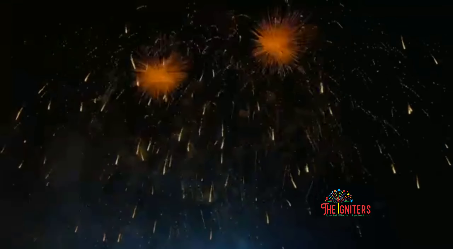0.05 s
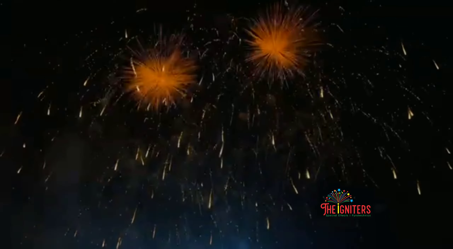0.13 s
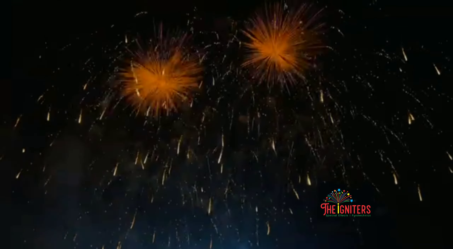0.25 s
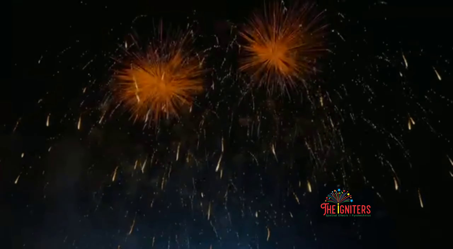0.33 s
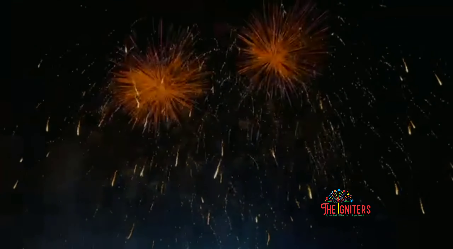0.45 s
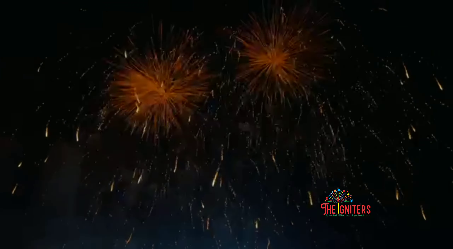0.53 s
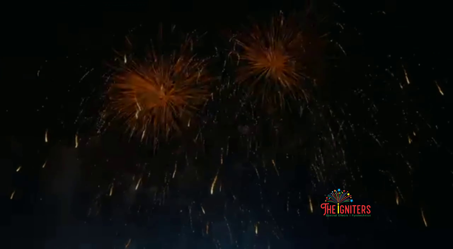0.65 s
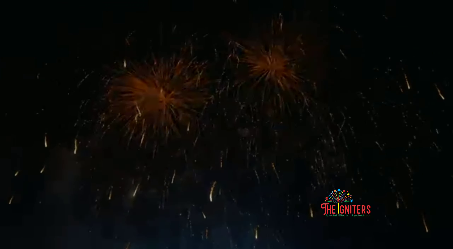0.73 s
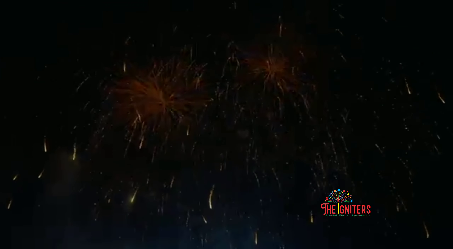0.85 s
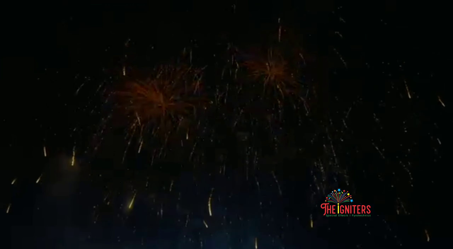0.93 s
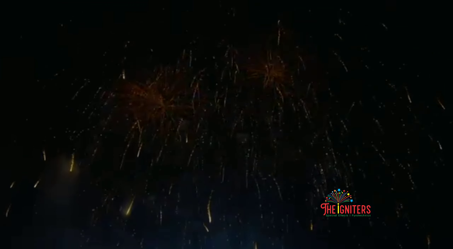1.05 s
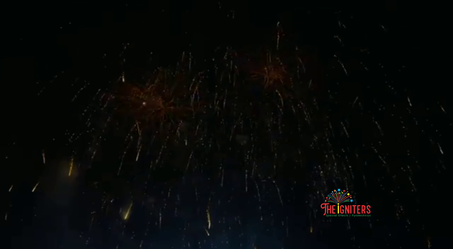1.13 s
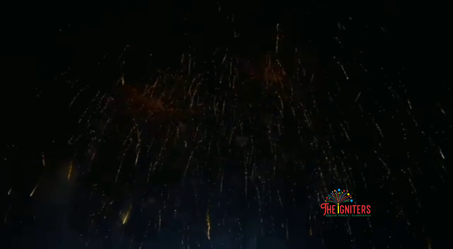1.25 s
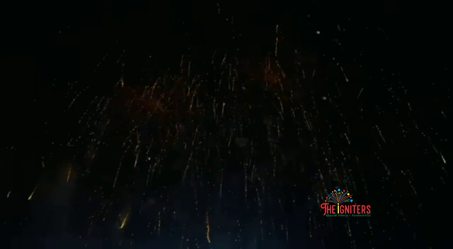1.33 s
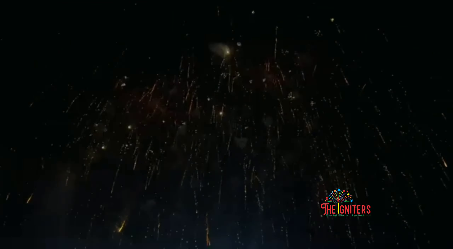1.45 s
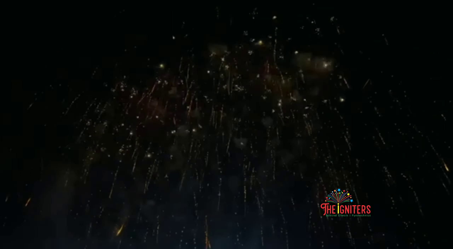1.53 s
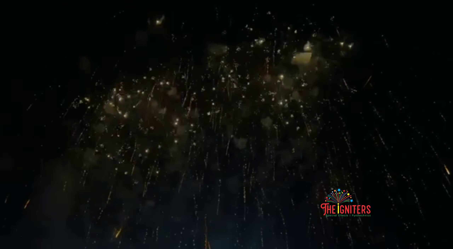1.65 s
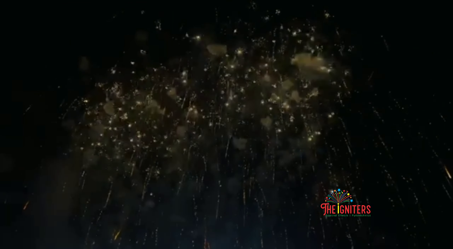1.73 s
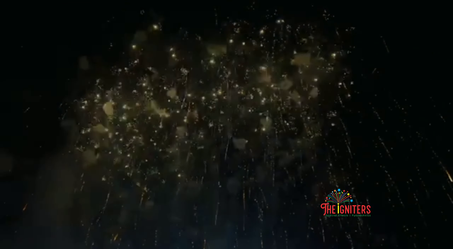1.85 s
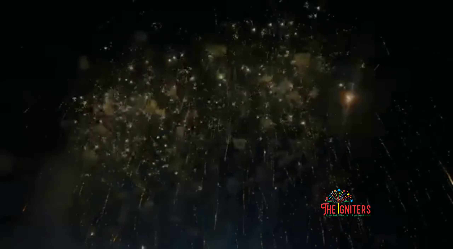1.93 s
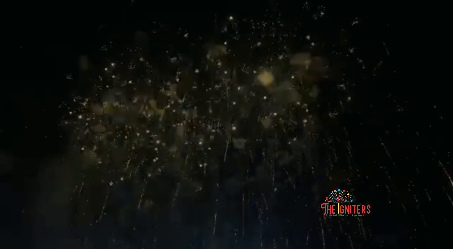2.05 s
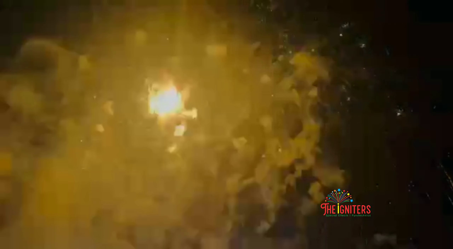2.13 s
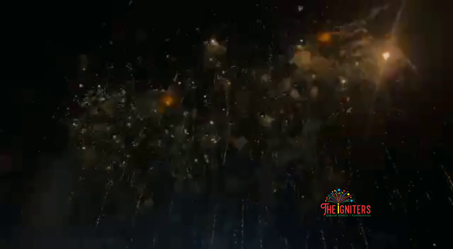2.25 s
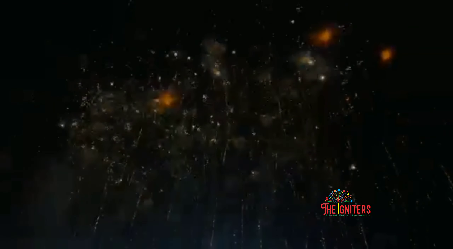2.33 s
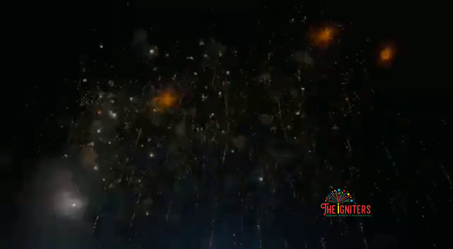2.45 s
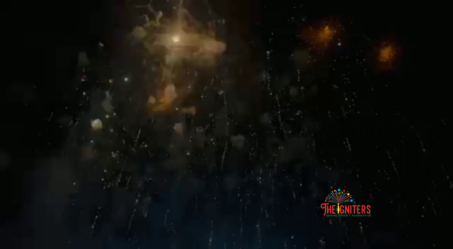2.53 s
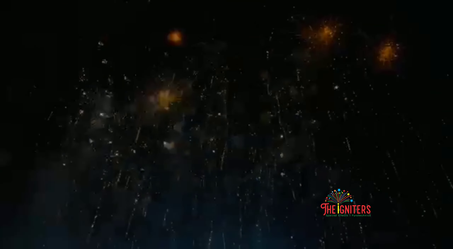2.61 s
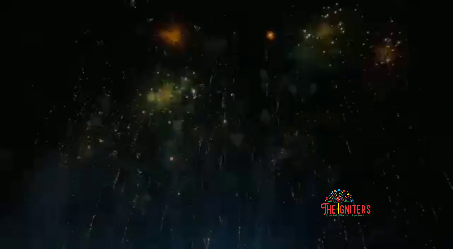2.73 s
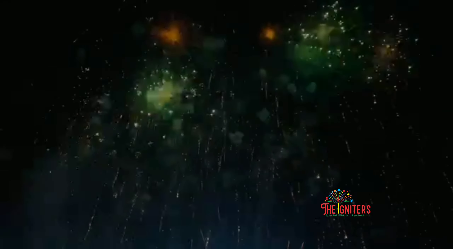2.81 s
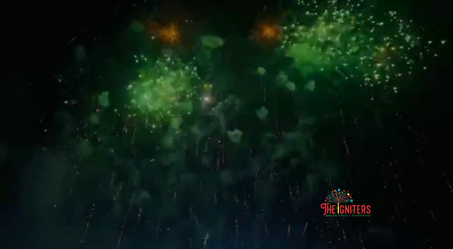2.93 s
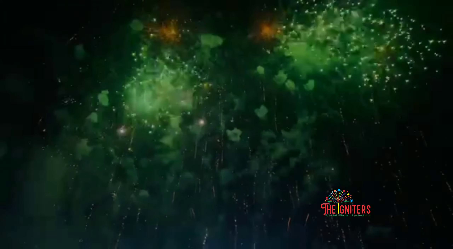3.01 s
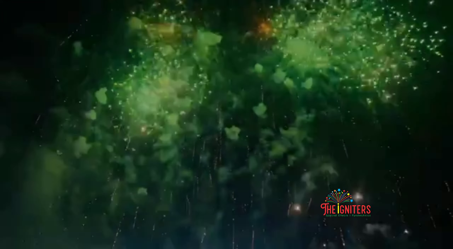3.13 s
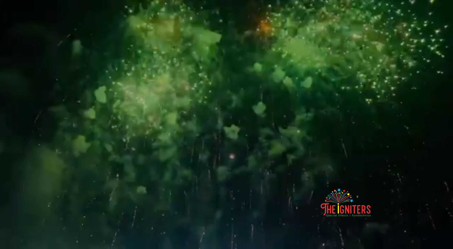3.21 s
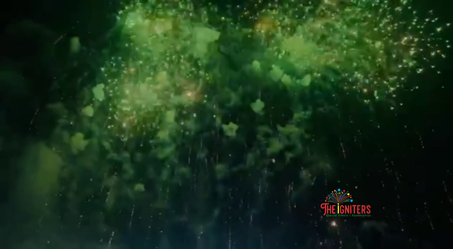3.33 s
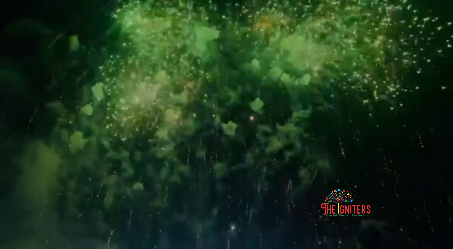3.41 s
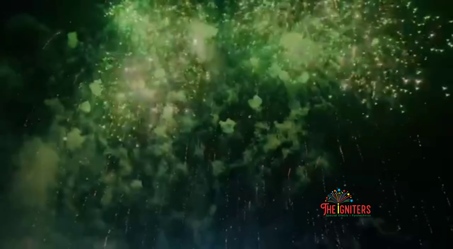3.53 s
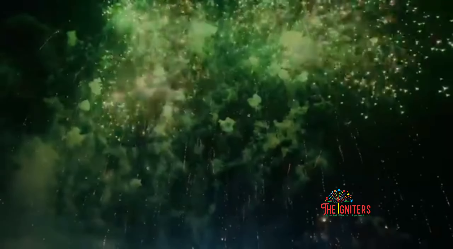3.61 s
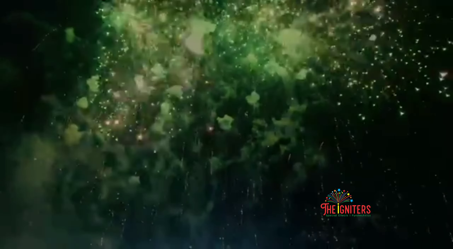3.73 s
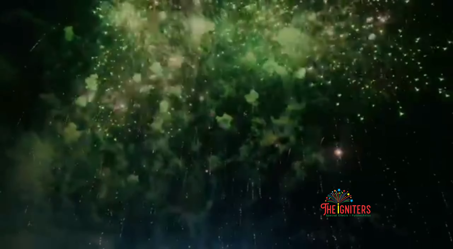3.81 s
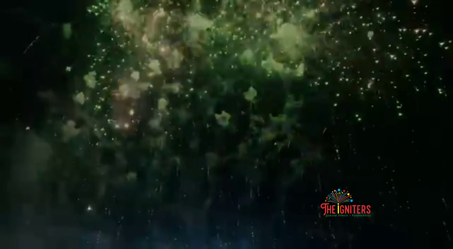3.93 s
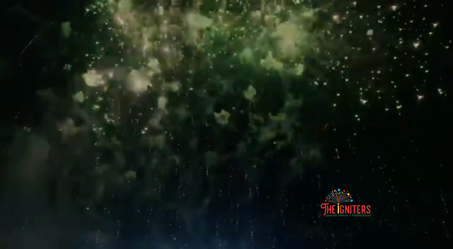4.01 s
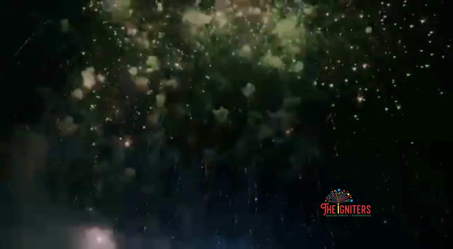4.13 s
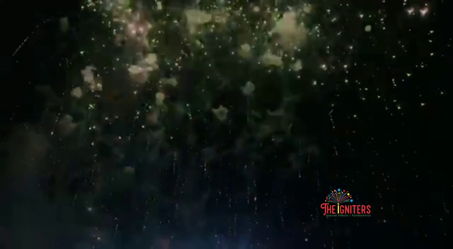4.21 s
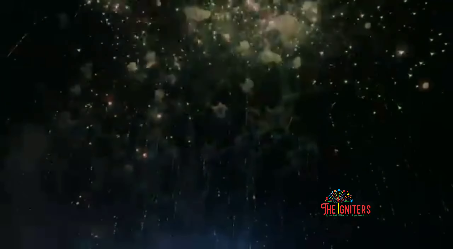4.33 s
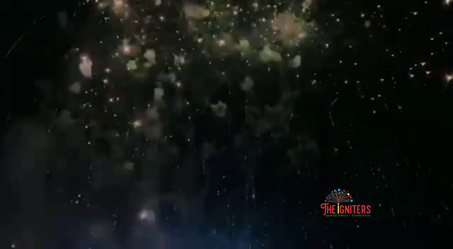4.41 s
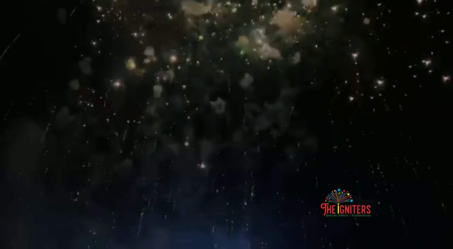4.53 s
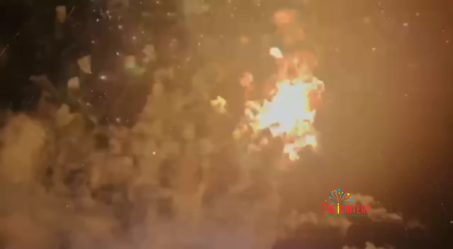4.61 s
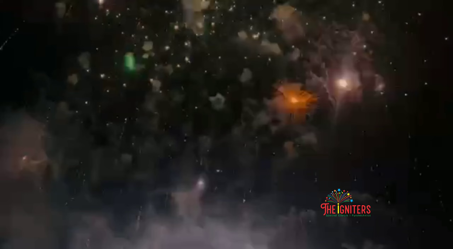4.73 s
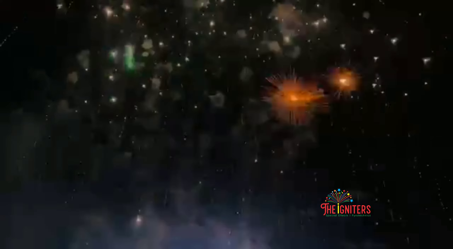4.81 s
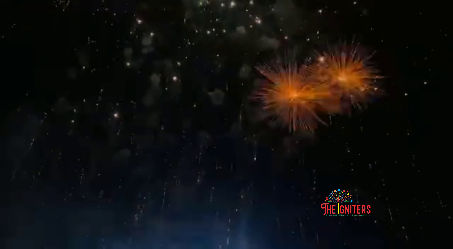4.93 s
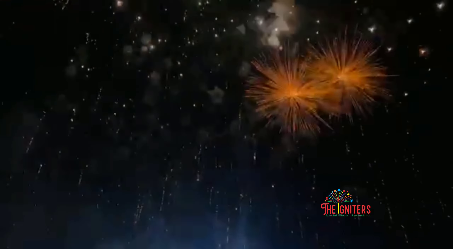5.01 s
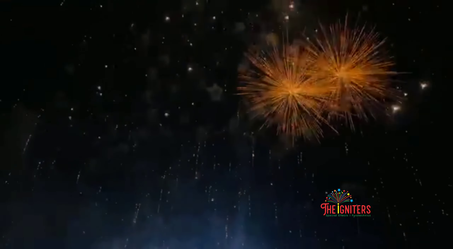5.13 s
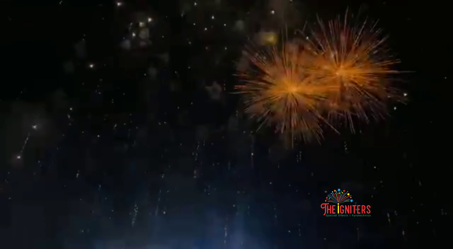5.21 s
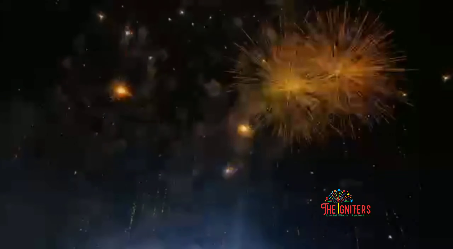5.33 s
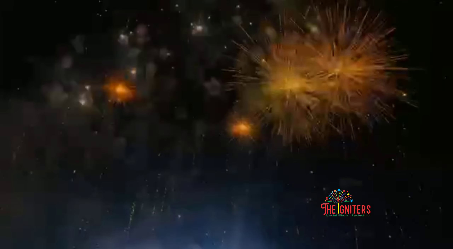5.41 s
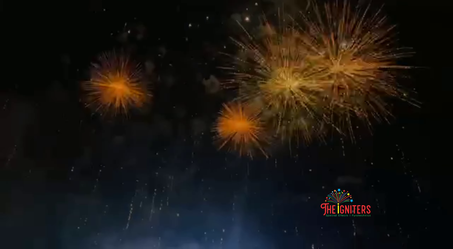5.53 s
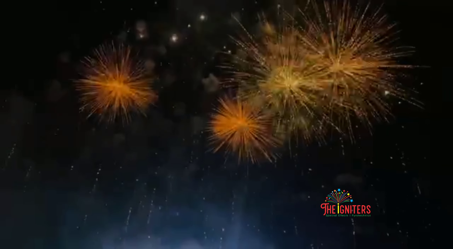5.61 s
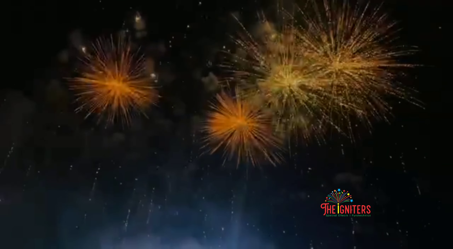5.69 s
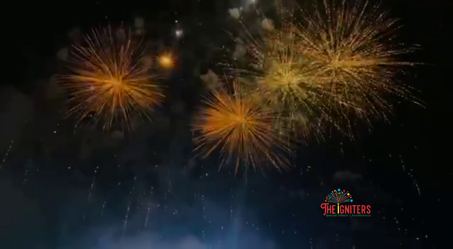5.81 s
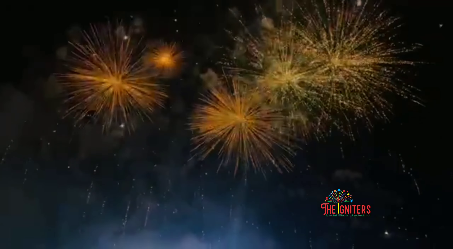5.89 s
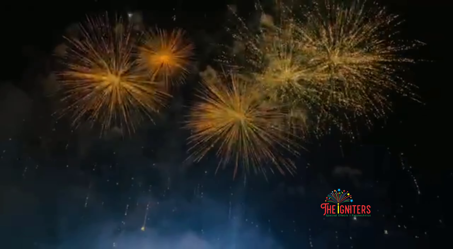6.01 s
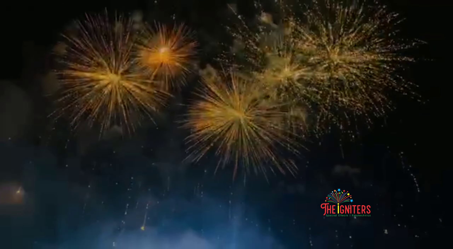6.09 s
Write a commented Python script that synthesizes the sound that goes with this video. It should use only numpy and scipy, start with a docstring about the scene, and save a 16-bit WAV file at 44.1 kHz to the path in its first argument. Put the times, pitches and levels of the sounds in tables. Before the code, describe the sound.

Outdoor fireworks heard from the ground at a distance. Three quick bangs open over a fading hiss, then rumble away. Low mortar thumps and a crackling cloud follow, four heavier bangs hit around three seconds, single stars snap, and after a rush of fizz two big booms and a final close pair land. One microphone ducks the background after each bang.

```python
"""Firework shells burst at night with sharp bangs, heard from the ground at a distance.
Each bang is one pressure pulse, doubled by the ground, with shaped noise rolling away over the land.
Mortars thump with low pulses; random clicks make star clouds crackle and an earlier shell's hiss fade.
Single stars snap, dense fine clicks fizz in rushes, hiss spurts out, and low noise rumbles underneath.
The recorder's limiter ducks everything after each bang."""
import sys
import numpy as np
from scipy import signal
from scipy.io import wavfile
from scipy.ndimage import uniform_filter1d, minimum_filter1d

SR = 44100
rng = np.random.default_rng(int(sys.argv[2]) if len(sys.argv) > 2 else 0)


def master(y):
    """Save y as 16-bit WAV."""
    cut = np.clip(np.atleast_2d(y).T, -1, 1)
    pcm = np.round(cut * 32767)  # scale
    wavfile.write(sys.argv[1], SR, pcm.astype(np.int16))


N = 271656
EDGE_HZ = 9000  # top of the sound's band

# Shell bursts: start_s, relative_level_db, treble_tilt_db_per_octave, crack_low_pass_hz,
# ground_echo_delay_ms, relative_roll_level_db
SHELLS = [(0.2724, -5, -0.8, 6000, 7.34, -3), (0.3633, -4.5, 0.66, 2296, 6.75, -3),
          (0.4687, -5, -0.95, 8000, 6.7, -6), (2.6940, 0.5, -0.33, 9000, 7.65, 3),
          (2.7754, -0.5, 0.82, 3360, 7.54, -2), (3.046, 0, -0.1, 5760, 7.3, 0.5),
          (3.297, 2.5, -1, 9130, 7.66, 1), (5.041, 3.5, -2, 6980, 6.4, 6.5),
          (5.1767, 3, -0.75, 5000, 6.73, 3.5), (5.7782, -2.5, -1.5, 9040, 5.9, 1.5),
          (5.8086, -3, 0.06, 7470, 6.2, -0.5)]
# Tone of a blast before tilting: pitch_hz, relative_level_db
BLAST = [(20, -32.5), (45, 5.5), (75, 5.5), (130, 1), (250, -2.5), (370, -11.5), (500, -11.5), (700, -17.5),
         (1400, -21.5), (2000, -28.5), (3200, -31), (5500, -34.5), (7500, -36.5), (9000, -33.5)]
# Tone of the roll after a bang: pitch_hz, relative_level_db
TAIL = [(25, -43), (38, -10.5), (54, 15), (90, -0.5), (140, 5.5), (250, -1.5), (350, -12.5), (500, -12.5),
        (700, -17.5), (1500, -23), (3000, -23), (6000, -23.5), (7500, -28.5), (9000, -39)]
# Dull echoes from things around: typical_delay_s, level_db
SLAPS = [(.063, -17), (.145, -28), (.232, -26.5)]


def shells(bang_db=8, ground_db=-3, ground_hz=4500, near_db=16, tail_db=14, slap_hz=400):
    """Each burst is one blast pulse, its duller ground bounce, nearby echoes and a long roll."""
    out = np.zeros(N)
    for start_s, level_db, tilt_db, top_hz, echo_ms, roll_db in SHELLS:
        blast = -gain_of(bang_db + level_db) * dulled(pulse(BLAST, tilt_db), top_hz)
        front = ragged(blast, scatter_db=2.5, decay_s=0.0017, above_hz=1370)
        bounce = ragged(blast, scatter_db=5, decay_s=0.0014, above_hz=1640)
        add(out, start_s, front)
        add(out, start_s + echo_ms / 1000, gain_of(ground_db) * dulled(bounce, ground_hz))
        for delay_s, slap_db in SLAPS:
            slap = dulled(grounded(blast, echo_ms, ground_db), slap_hz)
            slap_s = start_s + delay_s * rng.uniform(0.94, 1.03)
            add(out, slap_s, gain_of(slap_db) * slap)
        add(out, start_s, gain_of(near_db + level_db) * near_scatter())
        roll = rolling(TAIL, rise_s=0.0031, lumpy_db=4.5)
        add(out, start_s, gain_of(tail_db + roll_db) * roll)
    return out


def ragged(x, scatter_db, decay_s, above_hz):
    """Uneven air splits the sharp front into many paths a millisecond or so apart."""
    high_pass = signal.butter(2, above_hz, "highpass", fs=SR, output="sos")
    scattered = signal.sosfilt(high_pass, through(x, air(decay_s, size=1024)))
    return x + gain_of(scatter_db) * scattered


def grounded(x, delay_ms, echo_db):
    """The direct sound and the start of its bounce off the ground, kept to the same length."""
    out = x.copy()
    add(out, delay_ms / 1000, gain_of(echo_db) * x)
    return out


# Tone of the scatter from things close by: pitch_hz, relative_level_db
NEAR = [(30, -39.5), (80, 11), (250, 5.5), (500, -4.5), (900, -8.5), (1600, -13.5), (3000, -22.5),
        (6000, -22), (9000, -33)]


def near_scatter(length_s=0.077, size=8192):
    """A short, dense cluster of reflections that ends when the nearby things run out, energy 1."""
    t = np.arange(size) / SR
    cluster = through(rng.standard_normal(size), pulse(NEAR))
    cluster = cluster * np.exp(-(t / length_s) ** 4)
    return cluster / np.linalg.norm(cluster)


# How long the land keeps a bang rolling: pitch_hz, time_to_fall_60_db_s
ROLL = [(50, 1.52), (150, 1.6), (500, 1.6), (1500, 2.02), (4000, 1.44), (9000, 1.25)]


def rolling(spectrum, rise_s, lumpy_db, size=131072):
    """Scattered echoes of energy 1 build up, arrive in lumps and fade at a rate set by pitch."""
    hz, t, z = signal.stft(rng.standard_normal(size), SR, nperseg=1024, noverlap=768)
    lumps = evened(uniform_filter1d(rng.standard_normal(len(t)), 5))
    # patches vary over both pitch and time
    patches = uniform_filter1d(rng.standard_normal(z.shape), 12, 0)
    patches = evened(uniform_filter1d(patches, 6, 1))
    field_db = read(spectrum, hz)[:, None] - 60 * t / read(ROLL, hz)[:, None]
    # the lumps are strongest in the bass
    field_db = field_db + lumpy_db * (lumps / (1 + hz[:, None] / 900) + .5 * patches)
    tail = signal.istft(z * gain_of(field_db), SR, nperseg=1024, noverlap=768)[1][:size]
    tail = tail * (1 - np.exp(-np.arange(size) / SR / rise_s))
    return tail / np.linalg.norm(tail)


# Mortar launches and one ground echo: the 4.518 row is the bounce of the 4.511 launch's spit.
# Columns: start_s, relative_thump_level_db, thump_tilt_db_per_octave, relative_crack_level_db
LAUNCHES = [(1.85, -28, 14, -41), (2.112, -2.5, 3, -38), (2.159, -1.5, -2.5, -45), (2.321, -1.5, -2, -37),
            (4.511, -9.5, 0, -5), (4.518, 2.5, 2.5, -12.5), (4.576, -14, 1, -42)]
# Tone of the thump before tilting: pitch_hz, relative_level_db
THUMP = [(20, -27.5), (40, 2), (60, 10.5), (110, 1), (200, -7), (400, -21.5), (1200, -66.5), (5000, -102.5)]
# Tone of the spitting gas: pitch_hz, relative_level_db
SPIT = [(100, -23), (400, -8), (750, -1.5), (1100, 7.5), (1900, -5.5), (2900, -6), (3800, -28),
        (6000, -20.5), (9000, -35.5)]


def mortars(thump_db=-13, near_db=6, near_hz=160, roll_db=1, crack_db=-18, crack_s=0.011, size=4096):
    """Low thumps from the tubes, blurred by nearby echoes, with short spits of burning gas."""
    out, t = np.zeros(N), np.arange(size) / SR
    # a quick crack with a weaker, longer fade
    spit_shape = np.exp(-(t / crack_s) ** 2) + 0.24 * np.exp(-t / 0.07)
    for start_s, level_db, tilt_db, spit_db in LAUNCHES:
        add(out, start_s, -gain_of(thump_db + level_db) * pulse(THUMP, tilt_db))
        add(out, start_s, gain_of(near_db + level_db) * dulled(near_scatter(), near_hz))
        roll = rolling(THUMP, rise_s=0.029, lumpy_db=2.5)
        add(out, start_s, gain_of(roll_db + level_db) * roll)
        gas = evened(through(rng.standard_normal(size), pulse(SPIT)))
        add(out, start_s, gain_of(crack_db + spit_db) * gas * spit_shape)
    return out


# Clouds of crackling stars; the first row is the fading hiss of an earlier shell.
# Columns, with the last two at the busiest moment: start_s, life_s, relative_level_db, added_pops_per_s
CLOUDS = [(-0.78, 1.52, -42.5, 13000), (1.7784, 2.436, -30, 2200), (4, 1.8, -55.5, 1200),
          (4.5, 0.61, -45.5, 7000)]
# Tone of one small pop: pitch_hz, relative_level_db
POP = [(60, -32.5), (250, -2.5), (600, 2), (950, 2), (1400, 5.5), (2400, 1), (4200, -1), (6000, -6.5),
       (7500, -16.5), (9000, -21)]
CLOUD_RISE, CLOUD_FADE = 1.377, 3.7  # powers of life gone and left: a quick rise, a slow dying out
FEWEST_PER_S = 200  # base pop rate, to which each row adds
THINNING = 1.8  # power that thins the pops at a cloud's edges, so they are heard separately


def crackle(wet_db=-10, clump_db=45):
    """Small pops come in clumps, so thickly at times that they merge into a sizzle or hiss."""
    power, per_s = 0, FEWEST_PER_S
    for start_s, life_s, level_db, top_per_s in CLOUDS:
        busy = swell(start_s, life_s, CLOUD_RISE, CLOUD_FADE)
        power = power + (gain_of(level_db) * busy) ** 2
        per_s = per_s + top_per_s * busy ** THINNING
    clumps = evened(uniform_filter1d(rng.standard_normal(N), size=700))
    # the fewer the pops, the more the level wanders from clump to clump
    wander_db = clump_db * clumps / np.sqrt(np.maximum(per_s, 600))
    level = np.sqrt(power) * gain_of(wander_db)
    dry = level * evened(through(pops(per_s, spread_db=0.5), pulse(POP)))
    return dry + gain_of(wet_db) * through(dry, air(decay_s=0.034))


def pops(per_s, spread_db):
    """Random clicks of uneven size, scaled to rms 1 overall and kept even as their rate changes."""
    size_db = spread_db * np.minimum(rng.exponential(1, N), 3.5)
    size = gain_of(size_db) * rng.choice([-1, 1], N)
    happens = rng.random(N) < per_s / SR
    return evened(size * happens / np.sqrt(np.maximum(per_s, 1)))


def swell(start_s, life_s, rise, fade):
    """How busy a group of pops is, 0 to 1: it builds to a height, then dies out."""
    gone = np.clip((np.arange(N) / SR - start_s) / life_s, 0, 1)
    busy = gone ** rise * (1 - gone) ** fade
    height = rise / (rise + fade)  # share of life gone at the busiest moment
    return busy / (height ** rise * (1 - height) ** fade)


# Single stars that snap: start_s, relative_level_db, ground_echo_delay_ms
SNAPS = [(1.6404, -35, 8.1), (1.8099, -26, 6.7), (1.8270, -26, 6.6), (1.884, -46, 8.5), (1.915, -28, 6.7),
         (3.899, -35.5, 7.9), (3.917, -28, 7.5), (3.9543, -29, 5.3), (3.9768, -28, 7.8), (3.989, -31, 7),
         (4.036, -35, 7), (4.053, -29, 7.9), (4.0918, -35, 7.4), (4.103, -32, 8.9), (4.142, -36.5, 5.3),
         (4.272, -29.5, 5.1), (4.3014, -25, 5), (4.381, -25.5, 4.6), (4.492, -32, 5.7), (4.7065, -25, 6.2),
         (4.807, -30, 5.8), (4.829, -31, 4.9)]
# Tone of one snap: pitch_hz, relative_level_db
SNAP = [(80, 9), (400, 0.5), (1000, 0), (1800, 1.5), (3000, -0.5), (4500, -1), (6500, -11.5), (9000, -26)]


def snaps(snap_db=3, wet_db=-9):
    """Larger stars go off singly, each with a ragged edge and its own ground bounce."""
    dry = np.zeros(N)
    for start_s, level_db, echo_ms in SNAPS:
        snap = ragged(pulse(SNAP), scatter_db=-1, decay_s=.0013, above_hz=500)
        snap = gain_of(snap_db + level_db) * snap
        add(dry, start_s, grounded(snap, echo_ms, echo_db=-5))
    return dry + gain_of(wet_db) * through(dry, air(decay_s=0.02))


# Rushes of fizzing stars: start_s, life_s, relative_level_at_height_db
RUSHES = [(4.841, 0.73, -21), (5.21, 0.57, -36)]
# Tone of the fizz: pitch_hz, relative_level_db
FIZZ = [(100, -33), (300, -1.5), (600, 0), (1300, 5.5), (2400, 7.5), (3600, -3), (4800, -4), (5600, 0.5),
        (6700, -3), (7700, -18.5), (8700, -11)]
# Short spurts of hiss from burning stars: middle_s, relative_level_db, half_length_s
SPURTS = [(4.57, -38.5, 0.03), (5.233, -28, 0.025)]
# Tone of that hiss: pitch_hz, relative_level_db
SPURT = [(200, -42), (1000, -11), (2200, 3), (4000, 2), (6500, 3.5), (8500, -10)]
RUSH_RISE, RUSH_FADE = 3.06, 7.1  # powers of life gone and left in each swell


def fizz():
    """Very fine, dense pops swell into bright rushes; a few stars spurt on their own."""
    level = 0
    for start_s, life_s, level_db in RUSHES:
        level = level + gain_of(level_db) * swell(start_s, life_s, RUSH_RISE, RUSH_FADE)
    out = level * evened(through(pops(9000, spread_db=3.5), pulse(FIZZ)))
    for middle_s, level_db, half_s in SPURTS:
        puff = np.hanning(round(2 * half_s * SR))
        hiss = evened(through(rng.standard_normal(len(puff)), pulse(SPURT)))
        add(out, middle_s - half_s, gain_of(level_db) * puff * hiss)
    return out


# Tone of the far rumble: pitch_hz, relative_level_db
FAR = [(20, -27), (35, -19.5), (55, -1), (160, -2.5), (260, -7), (400, -13.5), (900, -23), (2000, -34),
       (4000, -41), (9000, -56.5)]
RUMBLE_DB = -48.5  # level going into the recorder


def rumble():
    """Old echoes from all around blend into a steady low bed."""
    return gain_of(RUMBLE_DB) * evened(through(rng.standard_normal(N), pulse(FAR)))


def gain_of(db):
    """Decibels to a factor."""
    return 10 ** (np.asarray(db) / 20)


def evened(x):
    """Scales to rms 1."""
    return x / np.sqrt(np.mean(x ** 2) + 1e-20)


def read(points, hz):
    """Reads a table on a log-frequency axis."""
    f, value = np.transpose(points)
    return np.interp(np.log(hz + 1), np.log(f + 1), value)


def add(mix, start_s, sound):
    """Mixes a sound in at a time, cutting it off at the end of the mix."""
    part = mix[max(round(start_s * SR), 0):][:len(sound)]
    part += sound[:len(part)]


def pulse(spectrum, tilt_db=0, size=4096):
    """A pressure pulse with this spectrum and its energy packed early, peak 1 before tilting."""
    hz = abs(np.fft.fftfreq(size, 1 / SR))

    def shape(db):
        """Minimum phase: the energy comes as early as it can."""
        log_spectrum = np.conj(signal.hilbert(np.log(gain_of(db))))
        return np.fft.ifft(np.exp(log_spectrum)).real

    # falls 40 dB per extra octave above the band edge
    level_db = read(spectrum, hz) - 40 * np.log2(np.maximum(hz / EDGE_HZ, 1))
    tilted = shape(level_db + tilt_db * np.log2(1 + hz / 300))
    return tilted / abs(shape(level_db)).max()


def through(x, response):
    """Convolves and keeps the length."""
    return signal.oaconvolve(x, response)[:len(x)]


def dulled(x, hz):
    """A gentle low-pass."""
    return signal.sosfilt(signal.butter(2, min(hz, SR / 3), fs=SR, output="sos"), x)


def air(decay_s, size=16384):
    """A short spray of reflections, energy 1."""
    spray = rng.standard_normal(size) * np.exp(-np.arange(size) / SR / decay_s)
    return spray / np.linalg.norm(spray)


def scene():
    """Everything at one microphone."""
    return (shells() + mortars() + crackle() + snaps() + fizz() + rumble())[None]


CEILING_DB, RECOVERY_DB_PER_S, LOOK_AHEAD_S = -4, 33, 0.0027  # the recorder's limiter


def limited(x):
    """Turns down just ahead of each peak over the ceiling, then recovers steadily."""
    over_db = np.maximum(20 * np.log10(abs(x) + 1e-9) - CEILING_DB, 0)
    fall = np.arange(N) / SR * RECOVERY_DB_PER_S
    # the largest cut so far, shrinking at the recovery rate
    gain_db = fall - np.maximum.accumulate(over_db + fall)
    span = round(2 * LOOK_AHEAD_S * SR)
    early_db = minimum_filter1d(gain_db, span)
    return x * gain_of(uniform_filter1d(early_db, span // 2))


def record(dry, low_cut_hz=30, lag_hz=140, order=8):
    """Cuts the lows, delays the bass so each bang chirps quickly down, then limits level and band."""
    low_cut = signal.butter(2, low_cut_hz, "highpass", fs=SR, output="sos")
    dry = signal.sosfilt(low_cut, dry)
    pole = np.exp(-2 * np.pi * lag_hz / SR)
    for _ in range(order):
        dry = signal.lfilter([-pole, 1], [1, -pole], dry)  # all-pass: shifts timing, not level
    band = signal.firwin(201, EDGE_HZ, window=("kaiser", 8), fs=SR)
    return signal.oaconvolve(limited(dry[0]), band, "same")[None]


dry = scene()
out = record(dry)
master(out)
```